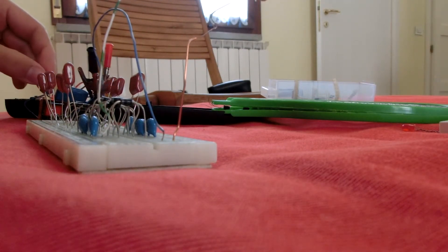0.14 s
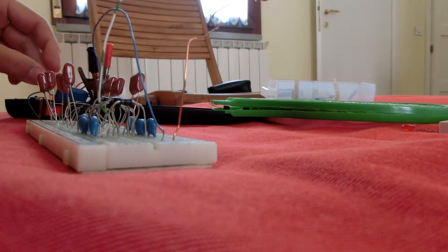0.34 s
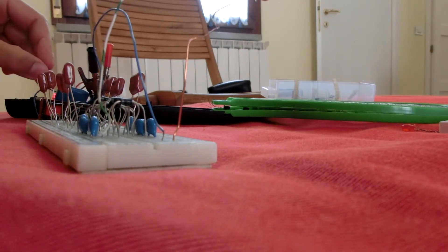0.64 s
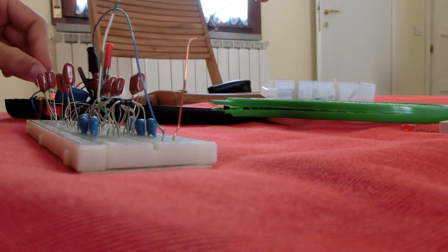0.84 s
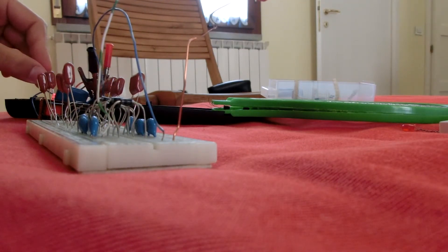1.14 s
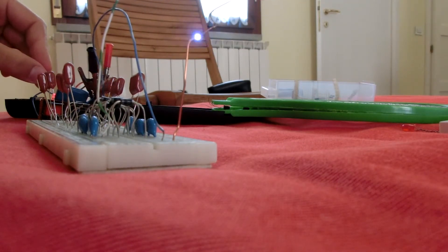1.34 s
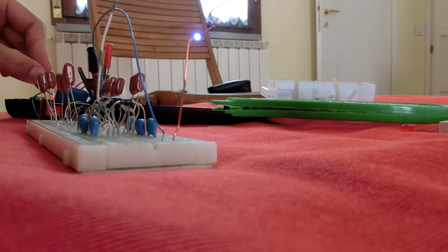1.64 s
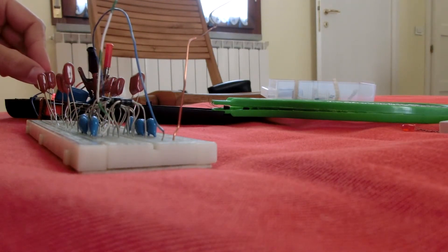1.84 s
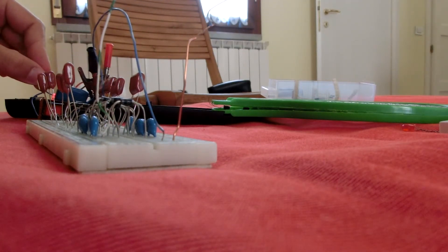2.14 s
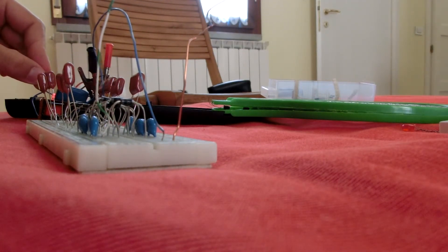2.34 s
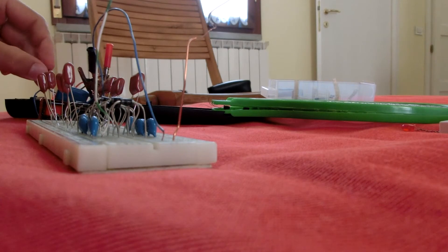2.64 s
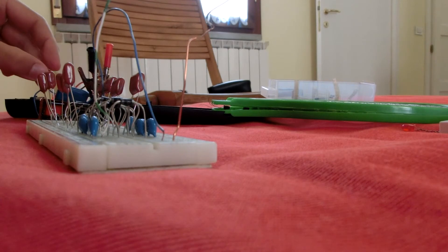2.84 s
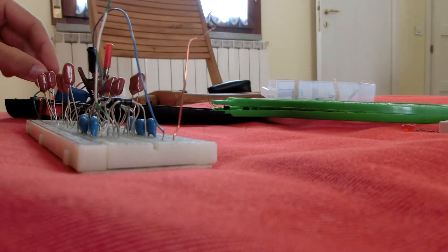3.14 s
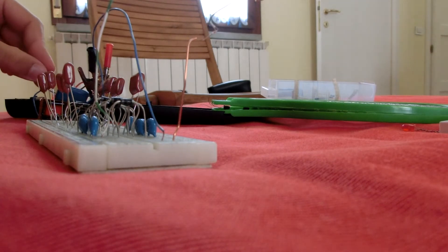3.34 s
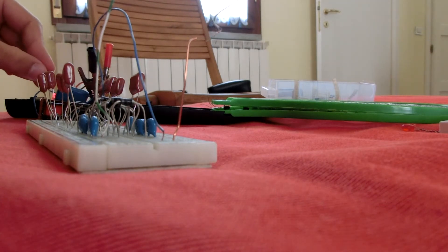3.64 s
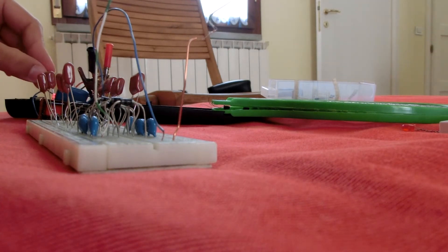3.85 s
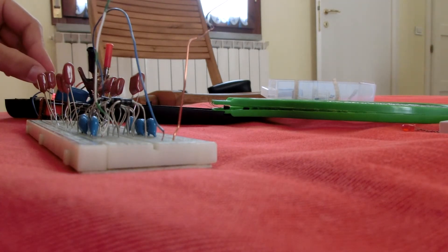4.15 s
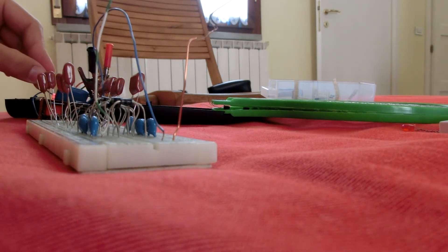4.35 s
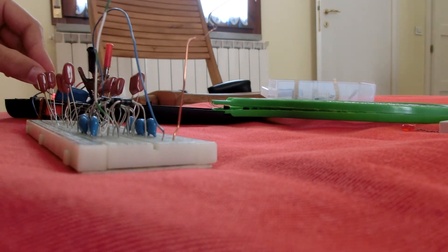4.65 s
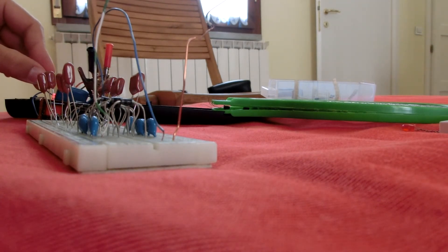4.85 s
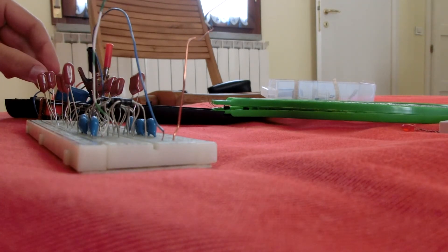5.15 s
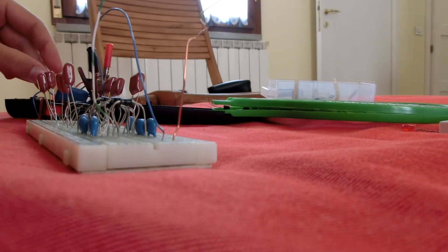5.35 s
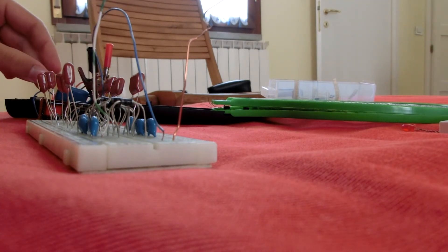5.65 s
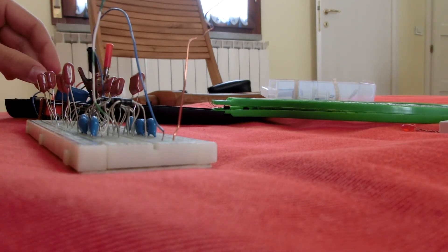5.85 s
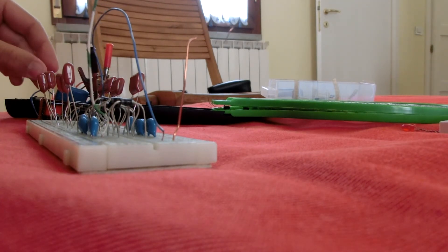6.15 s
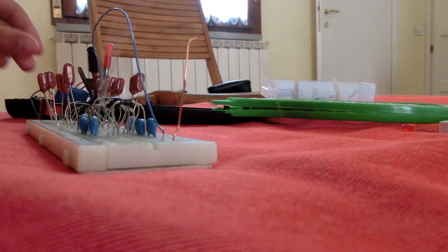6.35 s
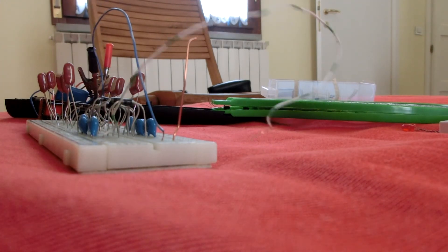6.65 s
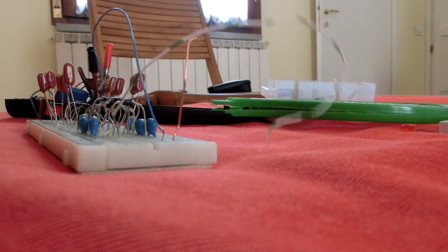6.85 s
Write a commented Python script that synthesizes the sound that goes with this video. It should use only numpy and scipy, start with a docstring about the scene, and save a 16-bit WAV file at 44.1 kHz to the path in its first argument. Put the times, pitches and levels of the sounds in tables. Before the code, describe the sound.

Irregular high-voltage sparks, bright and very short, snap near the microphone with a brief room echo. Before them a push switch clicks and a faint piercing whine glides down, trembling and stuttering as it strains. After a pause it clicks and whines again, with fewer cracks. Faint hum and room noise remain, ending with a dull tabletop knock and a cloth rustle.

```python
"""Sparking voltage multiplier

A hand-switched voltage multiplier on a cloth-covered table, close to a phone in a small hard room.
Its oscillator, a sum of three harmonics, whines downwards while the capacitors charge.
Sparks, filtered impulses roughened by noise, snap across a wire gap at uneven moments; the first and
biggest also kicks the microphone circuit, and the gain control ducks and creeps back for seconds.
Coloured noise makes the switch clicks, dull swells, the hand and the room; sines make the hum."""
import sys
import numpy as np
from scipy import signal
from scipy.fft import rfft, irfft
from scipy.io import wavfile
from scipy.ndimage import uniform_filter1d

SR = 44100
rng = np.random.default_rng(int(sys.argv[2]) if len(sys.argv) > 2 else 0)


def wav_out(sig):
    """Save sig, one row per channel (or a flat mono array), as 16-bit PCM at SR to the path in sys.argv[1]."""
    wavfile.write(sys.argv[1], SR, np.round(np.clip(np.atleast_2d(sig).T, -1, 1) * 32767).astype(np.int16))


N = 308259
T = np.arange(N) / SR  # time [s]

# sparks across the gap: (time [s], energy [dB], low-pitched body relative to the snap [dB])
SPARKS = [(0.9476, 40, -18), (1.2797, 28, -6.5), (1.3372, 14, -31), (1.3477, 2, -29), (1.3621, 3.5, -23),
          (1.3722, -0.5, -29), (1.5868, 26.5, -10), (1.9409, 21, -31), (2.1579, 17.5, -21),
          (2.5158, 21.5, -28.5), (4.0235, 26.5, -10), (4.3978, 14, -26.5), (4.4964, -15, -36),
          (5.327, 16.5, -19.5)]


def undb(db):
    """Decibels to gain."""
    return 10 ** (np.asarray(db) / 20)


def unit(x):
    """Scale each channel to energy 1."""
    return x / np.sqrt(np.sum(x ** 2, axis=-1, keepdims=True))


def read(points, hz):
    """Read a (frequency [Hz], level [dB]) table on a log-frequency axis."""
    table_hz, db = np.transpose(points)
    return np.interp(np.log(hz + 1), np.log(table_hz), db)


def response(points, size=1024):
    """Minimum-phase impulse response of energy 1 with the given colour."""
    log_gain = np.log(undb(read(points, np.fft.rfftfreq(size, 1 / SR))))
    cepstrum = irfft(log_gain)
    # folding the cepstrum onto positive times makes the response causal
    cepstrum[1:size // 2] *= 2
    cepstrum[size // 2 + 1:] = 0
    return unit(irfft(np.exp(rfft(cepstrum))))


def through(x, ir):
    """Pass a sound through an impulse response; gives channels x N."""
    return signal.oaconvolve(np.atleast_2d(x), np.atleast_2d(ir), axes=-1)[:, :N]


def noise(points):
    """Coloured noise of rms 1, unrelated left and right."""
    return through(rng.standard_normal((2, N)), response(points))


def strikes(times, db):
    """One impulse for each event."""
    x = np.zeros(N)
    np.add.at(x, np.round(np.asarray(times) * SR).astype(int), undb(db))
    return x


def walk(rate):
    """Slow random wander with a spread of 1, heading for a new value rate times a second."""
    k = int(SR / rate)
    held = np.repeat(rng.standard_normal(N // k + 1), k)
    smooth = uniform_filter1d(uniform_filter1d(held, k), k)[:N]
    return smooth / smooth.std()


def swell(peak_s, db, rise_db_per_s, fade_db_per_s):
    """Gain that rises to a peak and fades again, each at its own steady rate."""
    before = (peak_s - T) * rise_db_per_s
    after = (T - peak_s) * fade_db_per_s
    return undb(db - np.maximum(before, after))


def stroke(middle_s, half_s, db, steepness=3.4):
    """Gain of a smooth stroke: a rounded top with soft ends."""
    return undb(db) / (1 + np.abs((T - middle_s) / half_s) ** steepness) ** 2


def gate(start_s, end_s, edge_s=0.0054):
    """On between two moments, with short ramps."""
    return np.clip(np.minimum(T - start_s, end_s - T) / edge_s + .5, 0, 1)


def tail(t60, start, likeness):
    """Dense echoes of energy 1 that set in at start s and die away, partly shared by both ears."""
    t = T[:SR]
    shared = np.clip(likeness, 0, 1)
    common = np.sqrt(shared) * rng.standard_normal(SR)
    separate = np.sqrt(1 - shared) * rng.standard_normal((2, SR))
    return unit((common + separate) * (t >= start) * np.exp(-np.log(1000) * t / t60))


def room(x, early_db=-25, late_db=-20.0, dull_db=-33):
    """A brief cluster from the furniture and the longer walls; what lies below 4500 Hz lasts longest."""
    furniture = undb(early_db) * tail(.22, .011, .2)
    walls = undb(late_db) * tail(.52, .005, .03)
    treble_cut = signal.butter(2, 4500, fs=SR, output="sos")
    dull = undb(dull_db) * unit(signal.sosfilt(treble_cut, tail(1.0, .007, 0.69)))
    return through(x, furniture + walls + dull)


def ports(points):
    """A colour as the left and right microphone ports, which ring differently, hear it."""
    # (frequency [Hz], left minus right [dB]); each side is then scaled to energy 1
    port_tilt = [(500, -1), (4000, -3), (8000, -4.5), (9300, 6), (10300, -0.5), (12000, -1.5), (13100, -4),
                 (14000, -11.5), (14800, 3.5), (16000, 0)]
    hz = np.geomspace(50, SR / 2, 400)
    colour, half_tilt = read(points, hz), read(port_tilt, hz) / 2
    return np.array([response(np.column_stack([hz, colour + side * half_tilt])) for side in (1, -1)])


def ambience(air_db=-55, swell_db=1.44, waver_db=2):
    """Room noise, most alike in both ears near 600 Hz and widest in the treble, and appliance hum."""
    # room noise colour: (frequency [Hz], density [dB per Hz])
    air_colour = [(15, -39), (25, -9.5), (120, -0.5), (161, -7), (263, -2.5), (439, -8), (516, -7),
                  (607, -10), (818, -13.5), (1700, -22), (2480, -23.5), (4490, -29), (14000, -32),
                  (16000, -39.5)]
    # stereo width of the room noise: (frequency [Hz], side minus mid [dB])
    air_width = [(100, -4), (600, -11.5), (2400, -4.5), (6000, 1)]
    # steady hum of appliances, before its waver: (frequency [Hz], level [dB])
    hum_tones = [(118, -67), (258, -68), (371, -71), (522, -74), (802, -74), (1071, -80.5), (1771, -85),
                 (14250, -85.5)]
    mid, side = noise(air_colour)
    side = irfft(rfft(side) * undb(read(air_width, np.fft.rfftfreq(N, 1 / SR))), N)
    air = np.array([mid + side, mid - side]) * undb(air_db + swell_db * walk(3))
    hum = np.zeros(N)
    for hz, db in hum_tones:
        tone = np.sqrt(2) * np.sin(2 * np.pi * hz * T + walk(5))  # the phase drifts
        hum += tone * undb(db + waver_db * walk(3.7))
    return air + hum


def switch(spring_hz=4260, spring_t60=0.071, spring_bend_hz=1200, settle_s=.005, room_db=6):
    """The contact chatters as brief noise, its spring chirps down to a ring, and it scrapes on release."""
    # clicks of the push switch: (time [s], energy [dB], spring ring relative to the click [dB])
    presses = [(0.5502, -6.5, -46.5), (3.3408, -2.5, -47.5), (4.820, -23.5, -31), (4.881, -30.5, -24.5),
               (5.130, -36, -26), (5.665, -25, -13), (5.680, -33.5, 1.5)]
    # contact noise colour: (frequency [Hz], density [dB per Hz])
    click_colour = [(100, -24), (1500, -20), (4000, -24), (7000, -23), (9300, -8), (10900, 1.5),
                    (12000, -8.5), (13000, -1.5), (16000, -15)]
    s, db, ring_db = np.transpose(presses)
    t = T[:SR]
    click = noise(click_colour) * through(strikes(s, db), unit(np.exp(-t / 0.0016)))
    pitch_hz = spring_hz + spring_bend_hz * np.exp(-t / settle_s)
    phase = 2 * np.pi * np.cumsum(pitch_hz) / SR
    spring = unit(np.sin(phase) * np.exp(-np.log(1000) * t / spring_t60))
    dry = click + through(strikes(s, db + ring_db), spring)
    # the contact scrapes harder as the finger eases off, until it opens
    scrape = noise(click_colour) * swell(4.802, -58.5, rise_db_per_s=201, fade_db_per_s=600)
    return dry + undb(room_db) * room(dry) + scrape


def oscillator(jitter=.001, strained_jitter=0.0047, strain_hz=4900, flutter_db=2):
    """The transformer sings lower and louder as the charge builds; near full charge it trembles and stalls."""
    # the oscillator charges the capacitors: (start [s], end [s], starting pitch [Hz],
    # charging time constant [s], level at full charge before the core's colour [dB])
    charges = [(0.57, 2.29, 6010, .85, -63), (2.335, 2.43, 5020, .14, -59), (3.37, 3.69, 5450, .21, -61),
               (3.777, 3.815, 5150, .22, -66.5), (3.896, 3.946, 5171, 0.25, -66),
               (3.987, 4.39, 5150, .4, -67)]
    # overloaded, it stalls in short sagging chirps; sounds only if end is after start: (start [s], end [s])
    stalls = [(2.29, 2.315), (2.43, 2.7), (2.465, 2.35), (3.69, 3.77), (3.728, 3.742), (3.755, 3.777),
              (3.815, 3.856), (3.875, 3.896), (3.947, 3.988)]
    # how well the transformer radiates: (frequency [Hz], gain [dB])
    core = [(4700, -24.5), (5100, -11), (5400, -12), (5700, -9), (5950, 11), (9500, -1), (12000, 0),
            (14200, 1.5), (14900, -3.5), (15400, -14.5), (16200, -26)]
    full_hz, quieter_db_per_khz = 4870, 5.5  # a lighter load sings higher and more softly
    stall_hz, stall_sag_hz, stall_db = 4850, 230.95, -61
    hz, gain = np.full(N, float(full_hz)), np.zeros(N)
    for start, end, start_hz, charge_s, db in charges:
        on = gate(start, end)
        above_hz = (start_hz - full_hz) * np.exp(-np.maximum(T - start, 0) / charge_s)
        hz = np.where(on > 0, full_hz + above_hz, hz)
        gain = np.maximum(gain, on * undb(db - quieter_db_per_khz * above_hz / 1000))
    for start, end in stalls:
        on = gate(start, end)
        progress = np.clip((T - start) / (end - start), 0, 1)
        hz = np.where(on > 0, stall_hz - stall_sag_hz * progress ** 2, hz)
        gain = np.maximum(gain, on * undb(stall_db))
    hz = hz * (1 + np.where(hz < strain_hz, strained_jitter, jitter) * walk(260))
    phase = 2 * np.pi * np.cumsum(hz) / SR
    tone = sum(undb(read(core, k * hz)) * np.sin(k * phase) for k in range(1, 4))
    return np.sqrt(2) * tone * gain * undb(flutter_db * walk(32))


def sparks(scatter_db=-13, body_room_db=-6, rough_db=-6, rough_s=0.0014):
    """Each discharge is one pressure impulse, scattered by the parts around the gap and then by the room."""
    # colours of the snap, its low body and its room echo: (frequency [Hz], density [dB per Hz])
    snap_colour = [(100, -35), (1000, -29), (3000, -22), (4300, -13.5), (5800, -13), (7600, -7.5),
                   (8800, -19), (10000, -3), (11200, 0), (12100, -3), (13200, 1), (14300, -7.5),
                   (15100, -13), (16500, -18)]
    body_colour = [(30, -8), (200, 0), (1500, -3.5), (4000, -2.5), (9000, -11), (16000, -23)]
    echo_colour = [(100, -24.5), (1000, -20.5), (2200, -15), (4000, -8), (7000, -3), (10000, 0.5),
                   (13000, -1.5), (14500, -3.5), (16000, -11)]
    # distinct early reflections: (delay [s], level [dB])
    reflections = [(0.0020, -23.5), (0.0170, -32), (0.021, -33)]
    s, db, body_db = np.transpose(SPARKS)
    pulses, lows = strikes(s, db), strikes(s, db + body_db)
    snap = through(pulses, ports(snap_colour))
    body = through(lows, response(body_colour))
    # a millisecond of random noise, unrelated left and right, roughens each snap
    rough_envelope = through(lows, unit(np.exp(-T[:SR] / rough_s)))
    roughness = undb(rough_db) * noise(body_colour) * rough_envelope
    scatter = undb(scatter_db) * tail(0.014, .0002, 0.29)
    nearby = strikes(*np.transpose(reflections))[:SR] + scatter
    walls = room(through(pulses, response(echo_colour)) + undb(body_room_db) * body)
    return snap + body + roughness + through(snap, nearby) + walls


def surge(db=34.5, coupling_hz=73, q=0.49, pan_db=-2, mismatch=.08, delay_s=.00015, rise_hz=2500):
    """The biggest discharge induces a voltage step in the microphone circuit; its coupling makes a thump of it."""
    biggest_s = max(SPARKS, key=lambda spark: spark[1])[0]
    step = 1. * (T >= biggest_s + delay_s)
    step = signal.sosfilt(signal.butter(2, rise_hz, fs=SR, output="sos"), step)
    thumps = []
    for side in (1, -1):  # left, right
        w = 2 * np.pi * coupling_hz * (1 + side * mismatch)
        highpass = signal.bilinear([1, 0, 0], [1, w / q, w * w], SR)
        thumps.append(undb(db + side * pan_db / 2) * signal.lfilter(*highpass, step))
    return np.array(thumps)


def dull_swells(rough_db=0.2, rise_db_per_s=700):
    """Dull mid-range noise that rises quickly and fades steadily."""
    # (time of the peak [s], level [dB], fade [dB per s])
    swells = [(1.06, -55, 18), (2.87, -55.5, 8.5), (6.96, -60, 8)]
    # (frequency [Hz], density [dB per Hz])
    dull_colour = [(100, -10), (400, -0.5), (800, -1.5), (1500, -3.5), (3000, -12), (8000, -28),
                   (16000, -38)]
    gain = sum(swell(s, db, rise_db_per_s, fade) for s, db, fade in swells)
    return noise(dull_colour) * gain * undb(rough_db * walk(16))


def hand(rough_db=0.2, room_db=8):
    """Dull knocks on the table are filtered impulses; soft brushes over the cloth are shaped noise."""
    # soft knocks of the hand on the table: (time [s], energy [dB])
    knock_events = [(2.866, -21), (6.334, -17.5)]
    # the hand brushes over the cloth as it lets go: (middle [s], half length [s], level [dB])
    brushes = [(6.572, 0.21, -48), (6.985, 0.059, -53)]
    # colours of knocks and cloth: (frequency [Hz], density [dB per Hz])
    knock_colour = [(40, 8), (250, 6), (1200, -14), (3500, -18), (9000, -27.5), (16000, -36)]
    cloth_colour = [(200, -13), (2000, -9), (3500, -4.5), (5000, -0.5), (8000, -2.5), (10800, 0.5),
                    (14000, -5), (16000, -11)]
    blows = strikes(*np.transpose(knock_events))
    knocks = through(through(blows, response(knock_colour)), tail(.03, 0, .8))
    brush_gain = sum(stroke(*row) for row in brushes)
    brush = noise(cloth_colour) * brush_gain * undb(rough_db * walk(28))
    return knocks + undb(room_db) * room(knocks) + brush


def scene():
    """Everything that reaches the microphones and their circuit."""
    return ambience() + switch() + oscillator() + sparks() + surge() + dull_swells() + hand()


def gain_control(x, limit_db=-6.0, release_db_per_s=1.5962, size=2205):
    """Turns down at once when the recent power passes the limit, then recovers at a steady slow rate."""
    # mean power of both channels over the last size samples
    power = signal.fftconvolve(np.mean(x ** 2, axis=0), np.ones(size) / size)[:N]
    over = np.maximum(10 * np.log10(np.abs(power) + 1e-12) - limit_db, 0)
    recovery = release_db_per_s * T
    return x * undb(recovery - np.maximum.accumulate(over + recovery))


def record(dry, rumble_db=-73, rumble_hz=22, flicker_db=3, hiss_db=-91, block_hz=11, top_hz=16000):
    """Gain control, a faint flickering rumble and hiss, clipping at full scale, a DC blocker and the top cut."""
    rumble_noise = noise([(20, 1), (120, -1.5), (400, -25)])[0]  # (frequency [Hz], density [dB per Hz])
    rumble = signal.sosfilt(signal.butter(1, rumble_hz, fs=SR, output="sos"), rumble_noise)
    rumble = rumble / rumble.std() * undb(rumble_db + flicker_db * walk(7))
    hiss = undb(hiss_db) * rng.standard_normal((2, N))
    x = np.clip(gain_control(dry) + rumble + hiss, -1, 1)
    x = signal.sosfilt(signal.butter(1, block_hz, "highpass", fs=SR, output="sos"), x)
    return signal.sosfilt(signal.ellip(8, .2, 70, top_hz, fs=SR, output="sos"), x)


dry = scene()
out = record(dry)
wav_out(out)
```